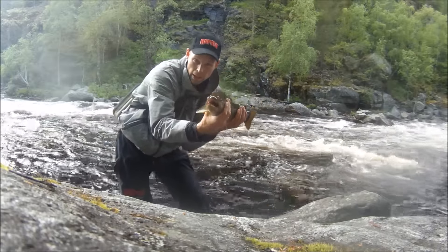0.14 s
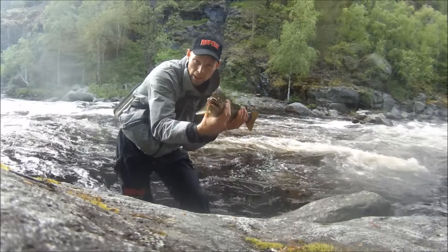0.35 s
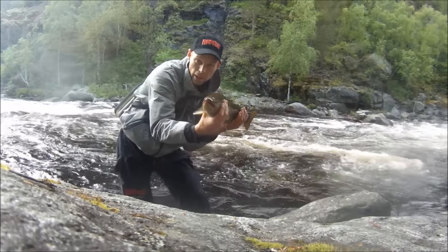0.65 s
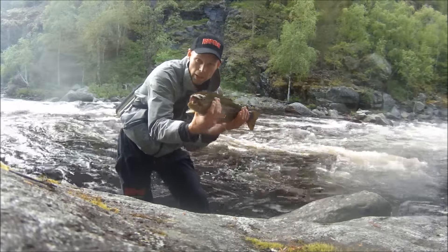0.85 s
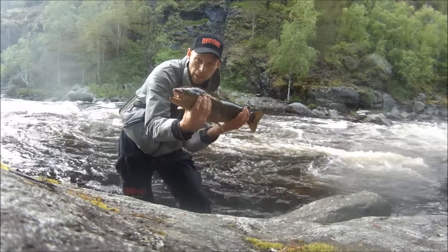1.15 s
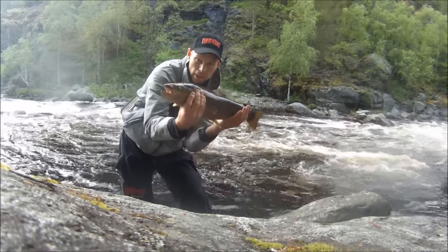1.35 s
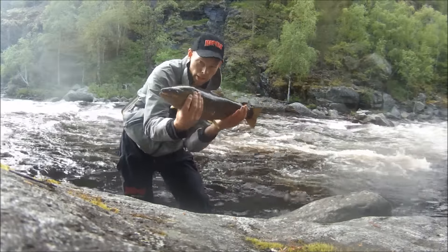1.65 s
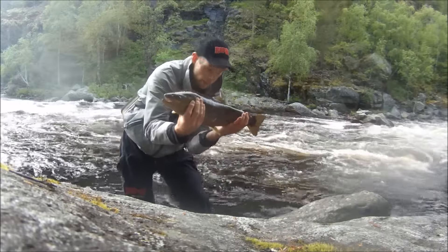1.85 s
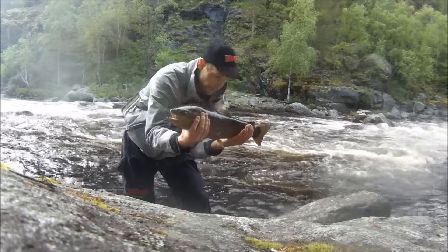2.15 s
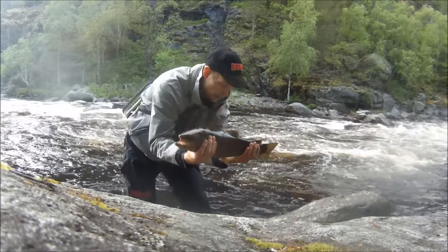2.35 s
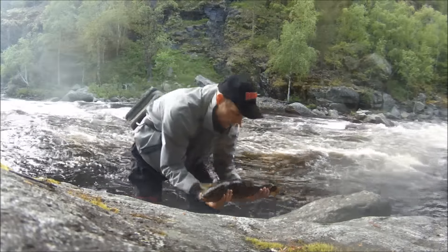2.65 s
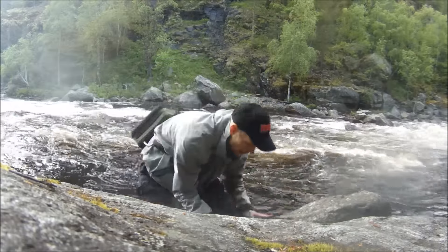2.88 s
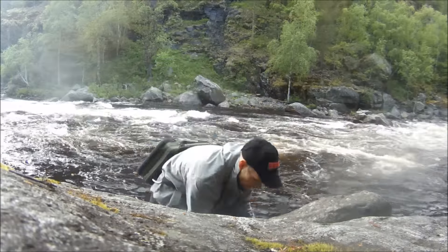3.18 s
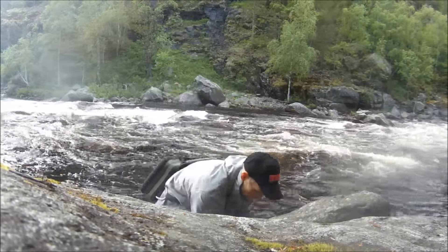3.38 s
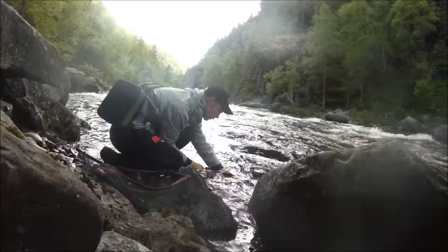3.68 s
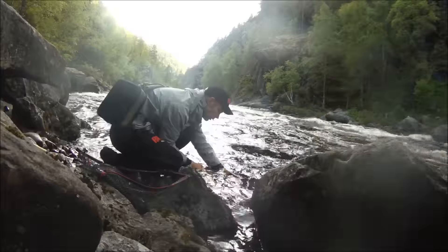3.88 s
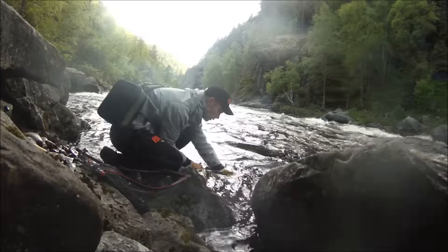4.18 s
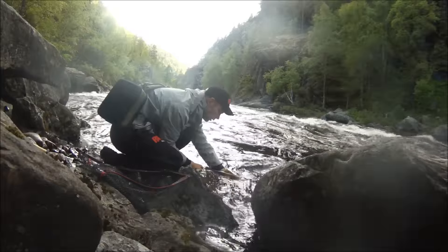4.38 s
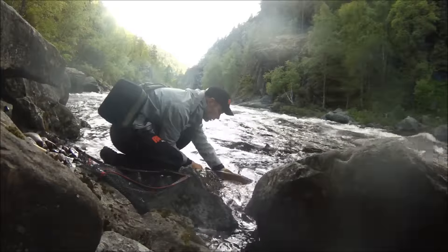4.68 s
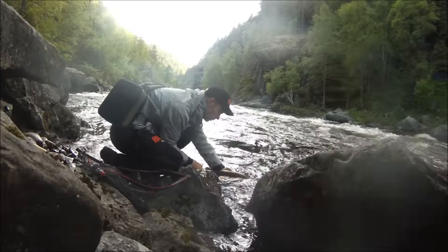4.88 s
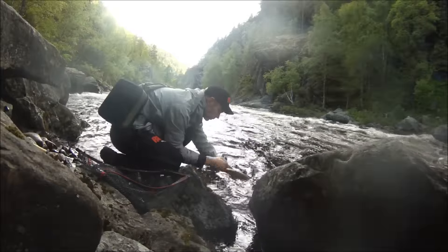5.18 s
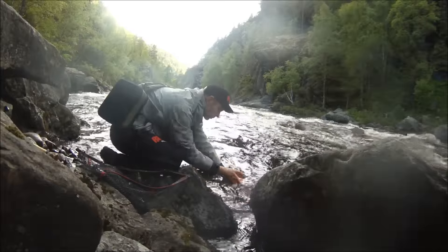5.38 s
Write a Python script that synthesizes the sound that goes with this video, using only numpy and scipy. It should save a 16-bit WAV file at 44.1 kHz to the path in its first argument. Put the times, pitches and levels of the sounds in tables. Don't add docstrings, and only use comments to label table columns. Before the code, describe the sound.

Steady rushing river rapids fade gradually down to silence, then a slightly darker roar of the same water fades back in.

```python
import sys
import numpy as np
from scipy import signal
from scipy.fft import rfft, irfft
from scipy.io import wavfile
from scipy.ndimage import uniform_filter1d

SR = 44100
rng = np.random.default_rng(int(sys.argv[2]) if len(sys.argv) > 2 else 0)


def dump(signal):
    limited = np.clip(np.atleast_2d(signal).T, -1, 1)
    pcm = np.round(limited * 32767).astype(np.int16)
    wavfile.write(sys.argv[1], SR, pcm)


def gain_from_db(level_db):
    decades = np.asarray(level_db, float) / 20
    return 10 ** decades


N = 243873
SWITCH_S = 3.7
BINS_HZ = np.maximum(np.fft.rfftfreq(N, 1 / SR), 1)


def at_bins(points):
    point_hz, point_db = np.transpose(points)
    return np.interp(np.log(BINS_HZ), np.log(point_hz), point_db)


def rms_one(x):
    return x / np.sqrt(np.mean(x ** 2) + 1e-20)


def drift(rate):
    hop = 40
    pole = np.exp(-2 * hop * np.pi * rate / SR)
    noise = rng.standard_normal(N // hop + 2002)
    slow = signal.lfilter([1], [1, -2 * pole, pole * pole], noise)[2000:]
    return np.interp(np.arange(N) / hop, np.arange(len(slow)), rms_one(slow))


def port_difference(mid):
    # f/Hz, level/dB
    port_levels = [(100, -60), (6500, -38), (8500, -19), (10500, -13.5), (12000, -11), (13400, -13),
                   (14500, -10), (15500, -10)]
    scatter = np.exp(2j * np.pi * rng.random(len(BINS_HZ)))
    return irfft(rfft(mid) * scatter * gain_from_db(at_bins(port_levels)), N)


def bubble_band(low, high, per_s, cycles, spread_db):
    born = np.flatnonzero(rng.random(N) < per_s / SR)
    size_luck, sign_luck, pitch_luck = rng.random((3, len(born)))
    sizes = gain_from_db(-spread_db * np.log(1 - .99 * size_luck)) * np.sign(sign_luck - .5)
    pitch = (pitch_luck * 4).astype(int)
    out = np.zeros(N)
    for k, hz in enumerate(np.geomspace(low, high, 9)[1::2]):
        clicks = np.full(N, 1e-18)
        clicks[born[pitch == k]] = sizes[pitch == k]
        decay = gain_from_db(-60 * hz / (cycles * SR))
        turn = 2 * np.pi * hz / SR
        out += signal.lfilter([0, np.sin(turn)], [1, -2 * decay * np.cos(turn), decay ** 2], clicks)
    return out


def white_water(bubble_share, shared_db, near_db, own_db):
    edges = 22 * 2 ** np.arange(0, 10.1, .5).clip(0, 9.8)
    churn = rng.standard_normal((2, N))
    shared, near = drift(5.4), drift(5.0)
    out = np.zeros(N)
    for k, (low, high) in enumerate(zip(edges, edges[1:])):
        band = signal.butter(2, [low, high], "band", fs=SR, output="sos")
        water = rms_one(signal.sosfilt(band, churn[k % 2]))
        if 150 < low < 6000:
            bubbles = bubble_band(low, high, per_s=.6 * low, cycles=22.0, spread_db=4.0)
            bubbles = rms_one(signal.sosfilt(band, bubbles))
            water = np.sqrt(1 - bubble_share) * water + np.sqrt(bubble_share) * bubbles
        near = .8 * near + .6 * drift(5.0)
        flicker = shared_db * shared + near_db * near + own_db * drift(19.0)
        out += np.sqrt(high - low) * gain_from_db(flicker) * water
    return out


def heard_at(water, spectrum, bumps):
    gain_db = at_bins(spectrum)
    for mid_hz, width_hz, lift_db in bumps:
        gain_db = gain_db + lift_db / (1 + ((BINS_HZ - mid_hz) / (.5 * width_hz)) ** 2)
    return rms_one(irfft(rfft(water) * gain_from_db(gain_db), N))


def among_rocks(water):
    # f/Hz, level/dB per Hz
    rock_spectrum = [(15, -62), (25, -31), (220, -3), (339, 0), (432, -4.5), (629, -2), (916, -2),
                     (1610, -5), (2170, -11), (2540, -21.5), (3150, -26), (6180, -28), (10600, -40.5),
                     (14200, -45), (15400, -47)]
    # f/Hz, width/Hz, lift/dB
    rock_bumps = [(4050, 250, 2.2), (6150, 250, 1.3), (9500, 800, 2), (14800, 1200, 2)]
    return gain_from_db(-37.5) * heard_at(water, rock_spectrum, rock_bumps)


def open_bank(water):
    # f/Hz, level/dB per Hz
    bank_spectrum = [(15, -62), (25, -31.5), (239, -3), (296, -5), (398, -0.5), (682, -1.5), (892, -5.5),
                     (1410, -4), (1570, -9), (2000, -11), (2990, -24.5), (4020, -18.5), (4850, -23.5),
                     (6180, -27.5), (15400, -45.5)]
    # f/Hz, width/Hz, lift/dB (negative dips)
    bank_bumps = [(3970, 120, 2.5), (6115, 100, 2), (9070, 240, -2.5), (9390, 200, 1.5), (10600, 500, -3.5),
                  (12100, 750, 0), (14800, 2000, 0)]
    return gain_from_db(-37) * heard_at(water, bank_spectrum, bank_bumps)


def scene():
    water = white_water(bubble_share=0.16, shared_db=0.11, near_db=0.14, own_db=0.08)
    first = np.arange(N) < SWITCH_S * SR
    mid = np.where(first, open_bank(water), among_rocks(water))
    side = port_difference(mid)
    return np.array([mid + side, mid - side])


def fader():
    step_s, phase_s, glide_s = 1 / 30, .0135, .002
    s = np.arange(N) / SR
    held = (np.floor((s + phase_s) / step_s) + .5) * step_s - phase_s
    falling = np.clip(1 - held / 3.71, 0, 1) ** 1.016
    falling *= held < 3.655
    rising = np.clip((held - 3.757) / 1.91, 0, 1) ** 1.015
    gain = uniform_filter1d(falling + rising, round(glide_s * SR))
    soft_opening = np.clip((s - 3.755) / 0.019, 0, 1)
    return gain * np.where(s < SWITCH_S, 1, soft_opening)


def top_cut(x):
    return signal.sosfilt(signal.butter(12, 15550, fs=SR, output="sos"), x)


def record(dry):
    gain = fader()
    mid = gain * (dry[0] + dry[1]) / 2
    side = gain * (dry[0] - dry[1]) / 2
    mid = np.round(mid * 2 ** 15) / 2 ** 15
    side = side * np.clip(gain / .1, 0, 1)
    below_top = np.fft.rfftfreq(N, 1 / SR) < 15280
    mix = irfft(rfft([mid + side, mid - side]) * below_top, N)
    return top_cut(mix)


dry = scene()
out = record(dry)
dump(out)
```